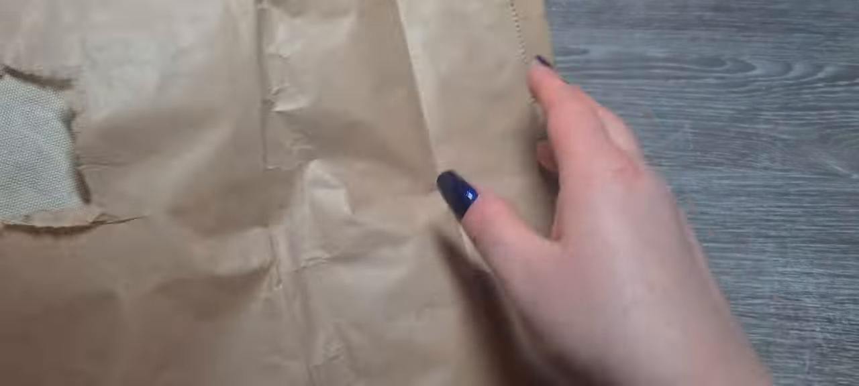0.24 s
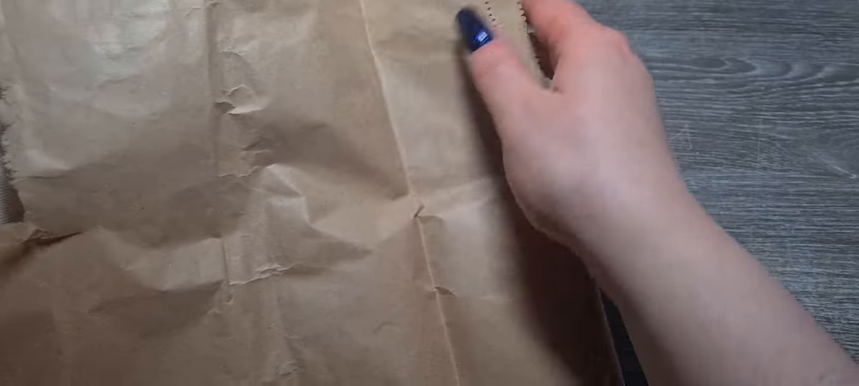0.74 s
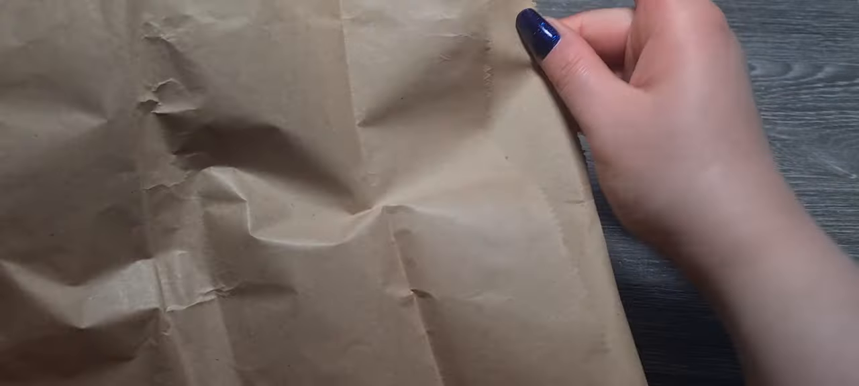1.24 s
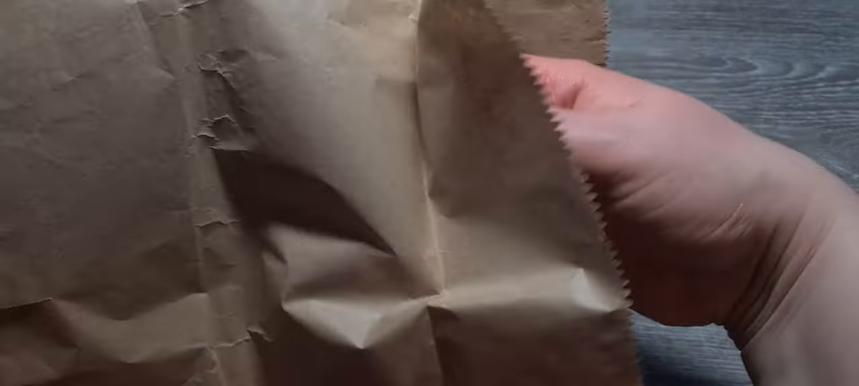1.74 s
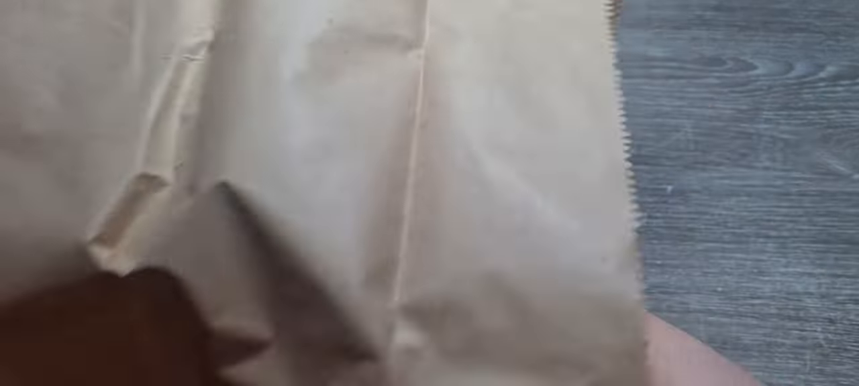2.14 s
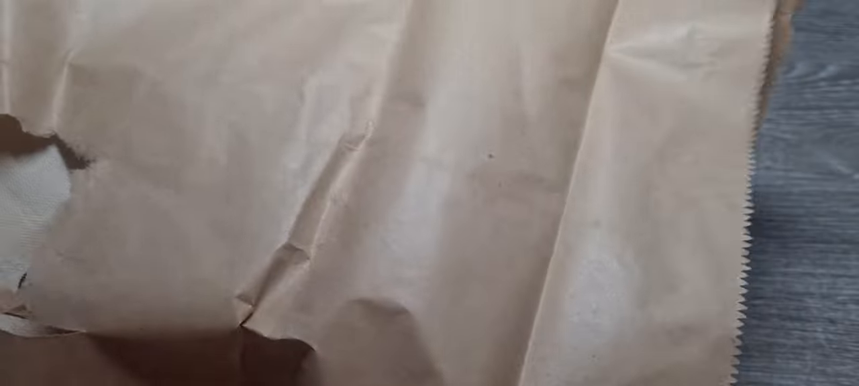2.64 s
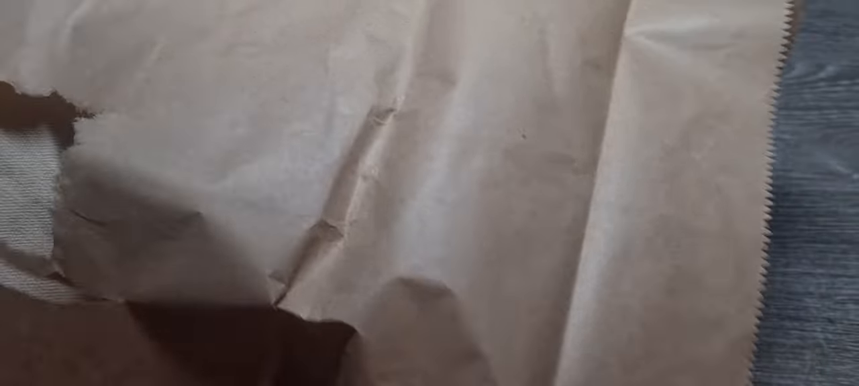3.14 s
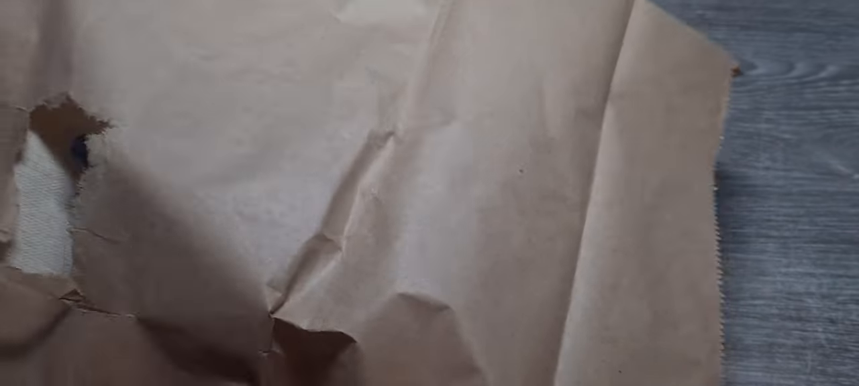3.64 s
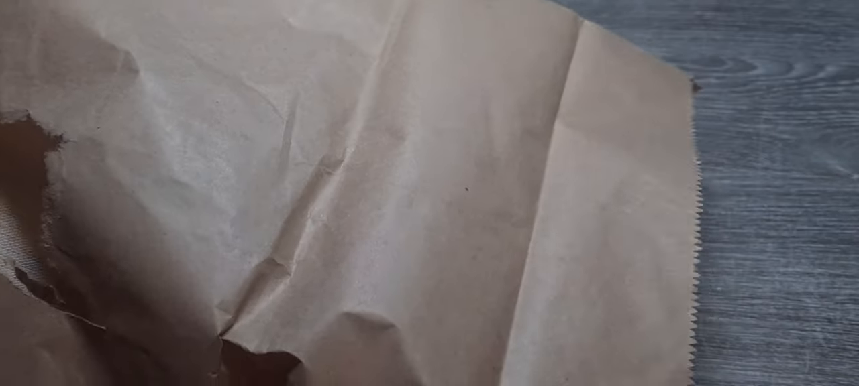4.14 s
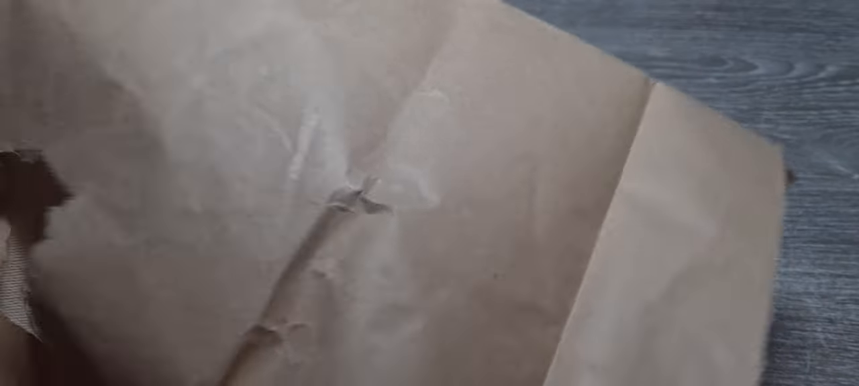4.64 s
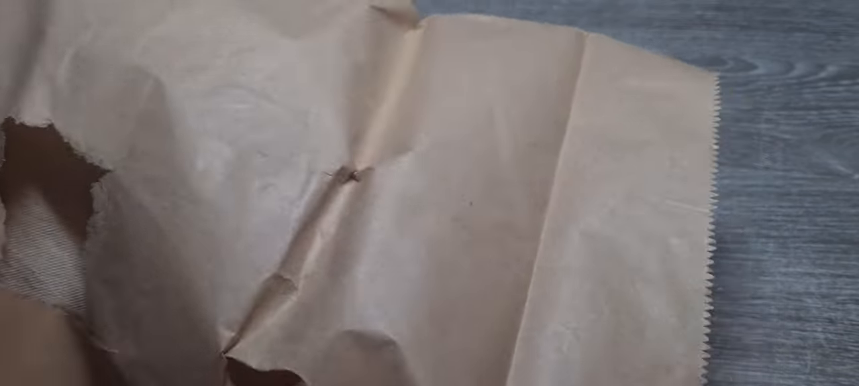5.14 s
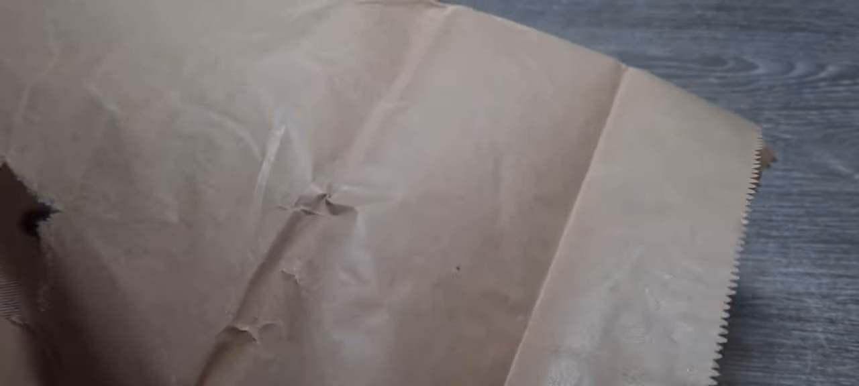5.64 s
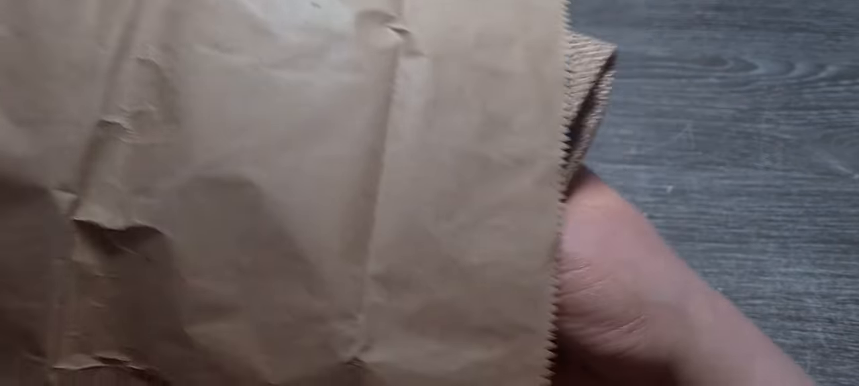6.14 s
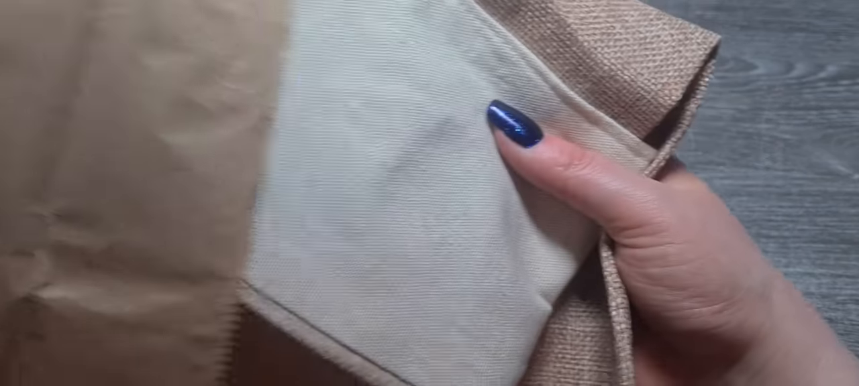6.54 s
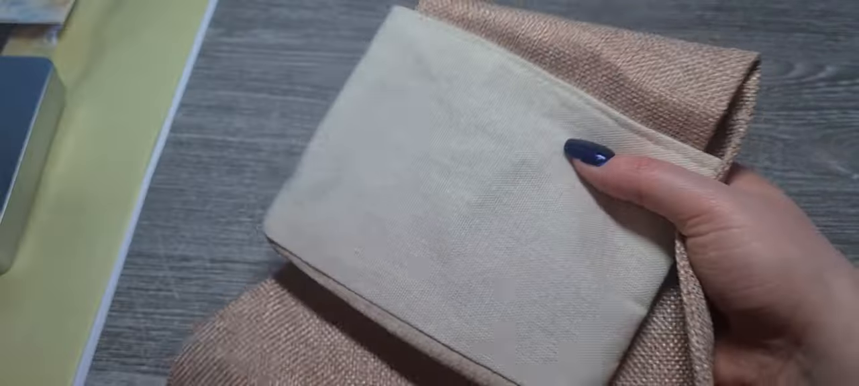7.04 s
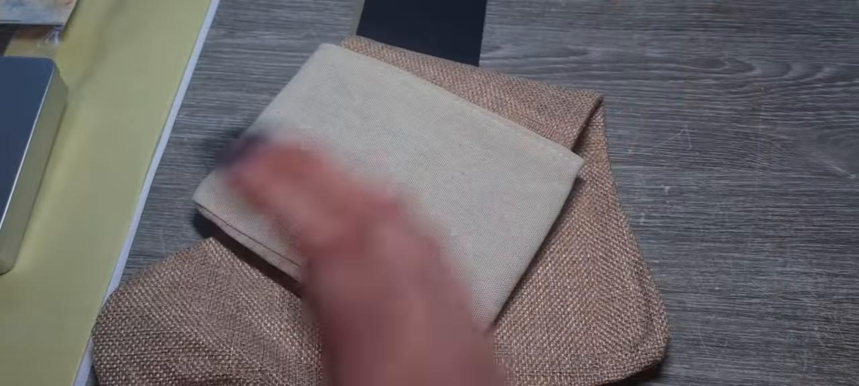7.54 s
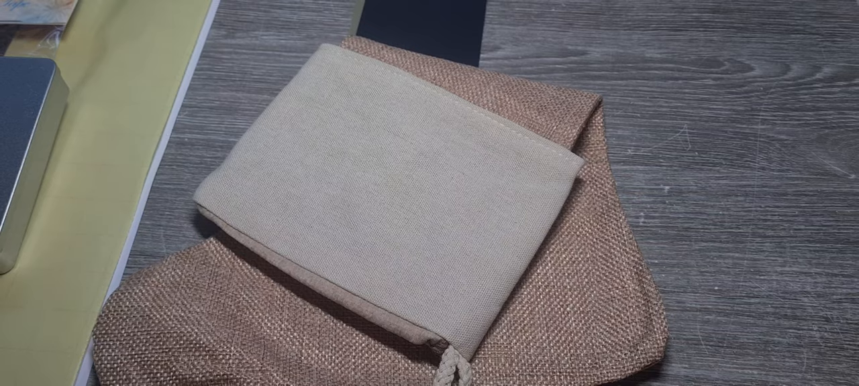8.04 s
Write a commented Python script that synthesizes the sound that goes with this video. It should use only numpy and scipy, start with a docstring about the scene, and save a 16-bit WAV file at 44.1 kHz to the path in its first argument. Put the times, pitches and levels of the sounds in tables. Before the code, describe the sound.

Hands work a torn paper bag open on a table. The paper crinkles and rubs in uneven bursts, with sharp snaps, dull pops from its flapping panels and soft bumps on the table top. Then cloth pouches slide out with a smooth, bright hiss, rustle and are laid down, and the paper stirs once more. It is heard close up in a small room, slightly from the left.

```python
"""A table in a small room. Hands work a torn kraft paper bag open: the paper snaps, ticks,
crinkles and rubs, broad panels flap and pop, and dull bumps come from the table top. Cloth pouches
slide out with a smooth friction hiss, rustle and are laid down; the paper stirs once more.
A close pair of microphones hears it slightly from the left."""
import sys
import numpy as np
from scipy import signal
from scipy.fft import rfft, irfft, next_fast_len
from scipy.io import wavfile
from scipy.ndimage import map_coordinates

SR = 44100
rng = np.random.default_rng(int(sys.argv[2]) if len(sys.argv) > 2 else 0)


def inscribe(sig):
    """Save sig as 16-bit PCM at rate SR to the path in sys.argv[1].

    A 1-D sig is mono; a 2-D sig holds one channel per row.
    Samples are clipped to [-1, 1] before scaling.
    """
    pcm = np.round(np.clip(np.atleast_2d(sig).T, -1, 1) * 32767)
    wavfile.write(sys.argv[1], SR, pcm.astype(np.int16))


N = 365796
TIME_S = np.arange(N) / SR
LEFT_LEAD_S = 0.0003363

# hand moves on the bag: start_s, attack_s, hold_s, crinkle_db, flex_db
BAG_PULLS = [(0.003, 0.02, 0.104, -38.5, -48.0), (0.14, 0.009, 0.05, -36.5, -45.5),
             (0.256, 0.008, 0.02, -41, -48), (0.429, 0.061, 0.01, -44.0, -55.0),
             (0.508, 0.025, 0.187, -46.0, -55.5), (0.668, 0.013, 0.092, -44.5, -60.0),
             (0.863, 0.009, 0.053, -44.5, -53.5), (1.183, 0.038, 0.033, -29.5, -40.0),
             (1.256, 0.009, 0.045, -41.5, -47.5), (1.379, 0.025, 0.009, -30.0, -39.5),
             (1.509, 0.035, 0.108, -43.5, -51.5), (1.719, 0.053, 0.086, -39.5, -48.0),
             (1.819, 0.011, 0.007, -24.0, -33.0), (1.929, 0.009, 0.006, -35.5, -42.0),
             (2.06, 0.064, 0.081, -31.0, -41.0), (2.216, 0.044, 0.073, -33.0, -41.5),
             (2.375, 0.044, 0.023, -33.5, -46.0), (2.473, 0.049, 0.093, -39.0, -48.0),
             (2.612, 0.024, 0.16, -41.0, -48.5), (2.931, 0.066, 0.029, -36.5, -45.5),
             (3.008, 0.023, 0.207, -40.0, -52.0), (3.139, 0.014, 0.14, -41.5, -48),
             (3.367, 0.045, 0.149, -40.0, -46.5), (3.555, 0.025, 0.143, -34.0, -41.5),
             (3.773, 0.035, 0.097, -44.5, -49.0), (3.925, 0.056, 0.129, -34.0, -42.5),
             (4.093, 0.013, 0.028, -34.5, -39.5), (4.254, 0.037, 0.021, -45.5, -53.5),
             (4.315, 0.017, 0.13, -38.0, -43.5), (4.541, 0.044, 0.09, -33.5, -36.5),
             (4.719, 0.03, 0.006, -39.5, -43.5), (4.796, 0.025, 0.118, -38.5, -44.0),
             (5.027, 0.069, 0.036, -47.0, -50.0), (5.088, 0.03, 0.068, -29.0, -36),
             (5.294, 0.044, 0.036, -31.5, -37.5), (5.382, 0.01, 0.089, -40.0, -46.0),
             (5.542, 0.03, 0.18, -41.0, -49.0), (7.946, 0.006, 0.087, -48.5, -64.5),
             (8.062, 0.016, 0.018, -40.0, -53.0), (8.173, 0.034, 0.034, -36.5, -52)]
# sharp paper snaps and ticks, plus one faint finger touch: start_s, level_db, length_ms, pitch_hz
SNAPS_AND_TICKS = [(0.0401, -23, 0.55, 5900), (0.1382, -22, 1.8, 7700), (0.1696, -26, 1.3, 5400),
                   (0.5167, -14, 0.48, 9400), (0.6927, -31, 1.0, 6000), (0.8659, -23, 1.17, 8600),
                   (1.0685, -46, 2, 3500), (1.1353, -34, 1.4, 4300), (1.1648, -25, 2.4, 8400),
                   (1.2219, -21, 1.5, 10400), (1.2869, -28, 1.2, 5000), (1.3803, -16.5, 0.84, 5800),
                   (1.7684, -21.5, 1.7, 5430), (1.8153, -9, 1.3, 8400), (1.8267, -13.5, 1.8, 12100),
                   (1.8531, -19, 1.3, 9000), (1.9356, -24, 2, 6170), (2.0417, -18, 0.63, 8300),
                   (2.0578, -13, 1.3, 10100), (2.0788, -18.5, 2.1, 6600), (2.1354, -16, 1.6, 7800),
                   (2.2098, -23, 2.4, 6200), (2.2174, -17, 1.2, 7300), (2.24, -16.5, 1.1, 7700),
                   (2.2842, -21.5, 2.8, 6200), (2.3251, -20, 0.85, 6400), (2.3979, -17, 0.92, 7800),
                   (2.4258, -25, 0.6, 1500), (2.7202, -21, 0.5, 14000), (2.9234, -14, 1.2, 8700),
                   (3.1404, -23.5, 1.1, 7500), (3.367, -17, 1.35, 8300), (3.4351, -25.5, 1.4, 7200),
                   (3.6068, -15, 1.1, 11700), (3.9562, -20.5, 1.7, 12500), (4.0255, -11.5, 0.62, 5680),
                   (4.0393, -14, 1.35, 7200), (4.2705, -24.5, 0.94, 7600), (4.3748, -26, 2.9, 5500),
                   (4.537, -21.5, 1.1, 5330), (4.5915, -22, 2.6, 6700), (4.72, -28, 3, 4060),
                   (4.8136, -22, 1.24, 7140), (4.9852, -31, 0.6, 6600), (5.1324, -21, 2, 9600),
                   (5.1525, -20, 1.6, 9800), (5.3216, -21, 2.3, 7500), (5.4236, -26, 2.3, 6300),
                   (5.5601, -26, 1.25, 5400), (5.6102, -24, 1.8, 6800), (5.6985, -19, 0.41, 5760),
                   (5.8982, -20, 1.6, 11200), (5.958, -22, 0.84, 11900), (6.6699, -27, 1.6, 7200),
                   (6.9208, -26.5, 0.74, 3900), (6.9555, -25, 1.4, 12400), (6.9868, -27.5, 2.6, 5870),
                   (7.274, -33, 4.4, 3500), (7.3939, -24, 1.1, 11000), (7.6629, -29.5, 0.95, 4700),
                   (7.7548, -24, 0.46, 3830), (7.8126, -24.5, 0.93, 7300), (8.1665, -26, 1.6, 4700),
                   (8.2041, -24, 0.97, 6600)]
# bag, hands and pouches hitting the table: start_s, level_db
TABLE_BUMPS = [(0.18, -55), (1.818, -50), (1.908, -50), (2.043, -43), (2.277, -48), (2.484, -46),
               (2.644, -50.5), (3.512, -57), (3.719, -49), (3.949, -42), (4.041, -40.5), (4.622, -48),
               (4.924, -55), (5.153, -50), (6.101, -47), (6.221, -51), (6.353, -52), (6.964, -52),
               (7.126, -52.5), (7.196, -46.5), (7.268, -43)]
# whole panels popping: start_s, level_db
PANEL_POPS = [(0.866, -37.5), (1.3841, -30), (1.8245, -31), (1.9346, -32), (1.996, -31.5), (2.0584, -30),
              (2.208, -33.5), (2.2402, -34.5), (2.4255, -34.5), (3.351, -38.5), (4.001, -32),
              (4.041, -31.5), (4.242, -40.5), (5.283, -35.5), (7.272, -38.5)]
# cloth dragged over paper: time_s, friction_db, flex_db
POUCH_SLIDE = [(5.75, -53, -71), (5.776, -37, -48.5), (5.972, -36.5, -47.5), (6.074, -32.5, -41),
               (6.252, -35.5, -44.5), (6.428, -41.5, -55.5), (6.56, -39, -56), (6.665, -48, -54.5),
               (6.725, -61, -78)]
# pouches shifted in the hand: start_s, attack_s, hold_s, rustle_db
POUCH_MOVES = [(6.761, 0.043, 0.027, -50.5), (6.881, 0.049, 0.006, -46.5), (6.961, 0.038, 0.077, -40.0),
               (7.069, 0.012, 0.109, -42.0), (7.279, 0.045, 0.118, -41.5), (7.513, 0.03, 0.082, -59.0),
               (7.669, 0.039, 0.115, -42.5)]
# hand position: time_s, left_over_right_db
HAND_PAN = [(0, 2), (1.2, -0.3), (2.2, 1.1), (3.3, 2), (4.05, -0.5), (5.7, 1.2), (6.2, 0.5), (6.9, 3),
            (7.7, 4), (8.2, 0.5)]

# spectral shapes of the sources: freq_hz, relative_db
CRINKLE_SPECTRUM = [(60, -24), (170, -8), (400, -14), (800, -5.5), (1200, 2.5), (2000, -7), (3400, 1.5),
                    (6500, 0), (12000, 0.5), (16000, -14)]
RUB_SPECTRUM = [(200, -22), (800, -16), (1300, -0.5), (2100, 9.5), (3300, 10), (6500, 6), (12000, 9),
                (16000, -4)]
SHEET_SPECTRUM = [(40, -20), (100, -11.5), (150, -5.5), (250, -3), (340, -2.5), (500, -5), (620, -4.5),
                  (880, -9.5), (1100, -3), (1700, -12.5), (4000, -35)]
SNAP_SPECTRUM = [(60, -14), (170, 6.5), (400, 0.5), (800, -0.5), (1200, 1.5), (2000, 0.5), (3400, 3.5),
                 (6500, 0.5), (12000, 1), (16000, -10)]
BUMP_SPECTRUM = [(20, -22), (45, -10.5), (75, -5.5), (130, -6), (220, -12.5), (500, -29.5), (2000, -58)]
POP_SPECTRUM = [(60, -21.5), (165, -0.5), (350, -1.5), (800, -7.5), (1200, 2.5), (1900, -8.5), (4000, -6.5),
                (16000, -29)]
SLIDE_SPECTRUM = [(300, -39), (900, -13), (1500, -6.5), (2300, -6), (3300, -0.5), (5000, -0.5), (7000, 0),
                  (11500, 3), (16000, -9)]
CLOTH_SPECTRUM = [(60, -1), (150, -3), (350, 6.5), (600, -5), (900, -6), (1450, 3), (2200, -2), (3500, 1),
                  (6500, -3), (11000, -3.5), (16000, -15)]
ROOM_TONE_SPECTRUM = [(20, -13), (110, 15), (220, -30), (1000, 9), (2000, -30), (7000, 5), (16000, -2)]

# resonant modes of the paper sheet: centre_hz, width_hz, gain_db
BAG_RESONANCES = [(165, 20, 6), (328, 51, 3.5), (436, 28, 3.5), (1180, 210, 2.5)]
# peaks and notches of the microphone ports: centre_hz, width_hz, gain_db
LEFT_PORT_BANDS = [(3640, 2800, -1.5), (7110, 1260, 9.5), (7850, 1620, -9), (11000, 1000, -3.5)]
RIGHT_PORT_BANDS = [(2400, 470, -8), (4320, 1500, -5), (7420, 580, 5.5), (8070, 1500, -11), (11500, 780, 1)]
# likeness of left and right: freq_hz, coherence
MIC_COHERENCE = [(100, 0.99), (300, 1), (600, 0.74), (1300, 0.44), (2500, 0.07), (15000, 0.15)]


def from_db(db):
    """Decibels to gain."""
    return 10 ** (np.asarray(db) / 20)


def unit_rms(x):
    """Scale to rms 1."""
    return x / np.sqrt(np.mean(x ** 2) + 1e-20)


def at_hz(table, hz):
    """Table lookup on a log-frequency axis."""
    table = np.array(table)
    return np.interp(np.log(hz + 1e-3), np.log(table[:, 0]), table[:, 1])


def waver(spread_db, rate_hz):
    """Random gain, gliding between rate_hz knots a second."""
    knots = rng.standard_normal(N // 10)
    drift = np.interp(TIME_S * rate_hz, np.arange(len(knots)), knots)
    return from_db(spread_db * unit_rms(drift))


def swell(start_s, attack_s, hold_s, release_s):
    """Gain that reaches 1 at start_s, holds and decays."""
    early = np.minimum(TIME_S - start_s, 0) / attack_s
    late = np.maximum(TIME_S - start_s - hold_s, 0) / release_s
    return np.exp(-np.minimum(early ** 2 + late, 20))


def move_force(rows, column):
    """Power sum of one swell per hand move."""
    swells = (from_db(row[column]) * swell(*row[:3], release_s=0.041) for row in rows)
    return np.sqrt(sum(gain ** 2 for gain in swells))


def gain_curve(rows, column, fade_s=0.015):
    """A dB column as gain over time, faded beyond its ends."""
    rows = np.array(rows)
    outside_s = np.maximum(rows[0, 0] - TIME_S, 0) + np.maximum(TIME_S - rows[-1, 0], 0)
    fade = np.maximum(1 - outside_s / fade_s, 0)
    return from_db(np.interp(TIME_S, rows[:, 0], rows[:, column])) * fade


def colour(x, spectrum, size=4096):
    """Minimum-phase filter; white noise keeps its power."""
    magnitude = from_db(at_hz(spectrum, np.fft.rfftfreq(size, 1 / SR)))
    cepstrum = irfft(np.log(magnitude))
    cepstrum[1:size // 2] *= 2
    cepstrum[size // 2 + 1:] = 0
    response = irfft(np.exp(rfft(cepstrum)))
    return signal.oaconvolve(x, response[None] / np.linalg.norm(response), axes=1)[:, :N]


def resonate(x, bands):
    """Peaks and notches in series."""
    for centre_hz, width_hz, gain_db in bands:
        g = from_db(gain_db / 2)
        k = np.tan(np.pi * width_hz / SR)
        tuning = -2 * np.cos(2 * np.pi * centre_hz / SR)
        x = signal.lfilter([1 + k * g, tuning, 1 - k * g], [1 + k / g, tuning, 1 - k / g], x)
    return x


def mic_pair(a, b, hz, lead_s):
    """Two independent spectra to stereo: alike in the bass, left leading."""
    coherence = np.clip(at_hz(MIC_COHERENCE, hz), 0, 1)
    mid, side = np.sqrt((1 + coherence) / 2) * a, np.sqrt((1 - coherence) / 2) * b
    return np.array([mid + side, (mid - side) * np.exp(-2j * np.pi * hz * lead_s)])


def noise(spectrum):
    """Coloured stereo noise, rms about 1."""
    size = next_fast_len(N, True)
    a, b = rfft(rng.standard_normal((2, size)))
    white = irfft(mic_pair(a, b, np.fft.rfftfreq(size, 1 / SR), LEFT_LEAD_S), size)
    return colour(white, spectrum)


def cracks(rows, broad_db, rise_ratio, creak_db, size=1024):
    """One resonant noise burst per row: start_s, level_db, length_ms, pitch_hz."""
    start_s, level_db, length_ms, pitch_hz = np.array(rows).T[:, :, None]
    offsets, hz = np.arange(size) - size // 2, np.fft.rfftfreq(size, 1 / SR)
    age = 1000 * offsets / SR / length_ms
    # longer cracks creak more around the peak
    creak = from_db(creak_db) * np.minimum(length_ms, 2) * np.exp(-np.abs(age) / 4.6)
    envelope = np.exp(-np.maximum(age, -age / rise_ratio)) + creak
    a, b = rfft(rng.standard_normal((len(start_s), 2, size)).swapaxes(0, 1) * envelope)
    facet = from_db(broad_db) + 1 / (1 + 0.9j * (hz / pitch_hz - pitch_hz / (hz + 1)))
    lead_s = LEFT_LEAD_S * rng.uniform(0.59, 1.485, start_s.shape)  # each from its own spot
    bursts = irfft(mic_pair(a * facet, b * facet, hz, lead_s))
    power_ratio = np.mean(envelope ** 2, axis=1) / np.mean(bursts ** 2, axis=(0, 2))
    bursts *= from_db(level_db) * np.sqrt(power_ratio)[:, None]
    indices = np.maximum((start_s * SR).astype(int) + offsets, 0).ravel()
    return np.array([np.bincount(indices, side.ravel(), N)[:N] for side in bursts])


def grains(rate_hz, spread_db, length_ms, low_hz, high_hz, count=6000):
    """Tiny random cracks, many weak, few strong; rms 1."""
    wait, strength, length, pitch = rng.uniform(1e-6, 1, (count, 4)).T
    start_s = np.cumsum(-np.log(wait)) / rate_hz
    level_db = spread_db * np.minimum(-np.log(strength), 3)
    rows = np.c_[start_s, level_db, length_ms * (0.5 + length), low_hz * (high_hz / low_hz) ** pitch]
    rows = rows[start_s < N / SR]
    return unit_rms(cracks(rows, broad_db=-12.5, rise_ratio=0.5, creak_db=-8.5, size=256))


def crinkling(effort, flex, flex_share=0.45):
    """Small creases and fibres give way while paper rubs on paper."""
    ticks = grains(rate_hz=340, spread_db=5.5, length_ms=1.0, low_hz=2170, high_hz=13800)
    crackle = colour(ticks, CRINKLE_SPECTRUM)
    rub = noise(RUB_SPECTRUM) * waver(spread_db=2, rate_hz=220)
    rub_force = effort * (flex / effort) ** flex_share
    return from_db(-4) * effort * crackle + from_db(-0.9) * rub_force * rub


def flexing_sheet(flex):
    """Broad panels flap unevenly and ring at the sheet's own modes."""
    flaps = flex * noise(SHEET_SPECTRUM) * waver(spread_db=3.25, rate_hz=90)
    return from_db(-3.2) * resonate(flaps, BAG_RESONANCES)


def lesser_creases(force, rate_hz=22, low_hz=3350, high_hz=9900, count=400):
    """Mid-sized creases snap at random, as loud as the hands press."""
    wait, length, pitch = rng.uniform(1e-6, 1, (count, 3)).T
    start_s = np.cumsum(-np.log(wait)) / rate_hz
    force_db = 20 * np.log10(np.interp(start_s, TIME_S, force))
    level_db = force_db + rng.normal(6, 2, count)
    length_ms = 0.5 + length
    rows = np.c_[start_s, level_db, length_ms, low_hz * (high_hz / low_hz) ** pitch]
    snaps = cracks(rows[start_s < N / SR], broad_db=-14.5, rise_ratio=0.54, creak_db=-15)
    return colour(snaps, SNAP_SPECTRUM)


def snaps_and_ticks():
    """Sharp paper snaps and ticks, plus one faint finger touch."""
    snaps = cracks(SNAPS_AND_TICKS, broad_db=-12, rise_ratio=0.67, creak_db=-16.5)
    return from_db(-0.5) * colour(snaps, SNAP_SPECTRUM)


def table_bumps(flex, handling):
    """Dull knocks, plus air pushed along the table by paper and cloth."""
    knocks = sum(from_db(level_db) * swell(start_s, attack_s=0.01, hold_s=0.0075, release_s=0.029)
                 for start_s, level_db in TABLE_BUMPS)
    air = (from_db(-19) * flex + from_db(-21) * handling) * waver(spread_db=3, rate_hz=25)
    return (from_db(1) * knocks + air) * noise(BUMP_SPECTRUM)


def popping_panels(length_ms=1.98, pitch_hz=1080):
    """Broad panels give way more slowly, with a dull pop."""
    rows = [(start_s, level_db, length_ms, pitch_hz) for start_s, level_db in PANEL_POPS]
    pops = cracks(rows, broad_db=5.5, rise_ratio=0.87, creak_db=-13.5)
    return from_db(1) * colour(pops, POP_SPECTRUM)


def sliding_pouches():
    """Cloth drawn over paper: a smooth, bright friction hiss."""
    friction = gain_curve(POUCH_SLIDE, column=1)
    return from_db(3.5) * friction * noise(SLIDE_SPECTRUM) * waver(spread_db=1.7, rate_hz=230)


def rustling_cloth(handling):
    """Coarse threads catch and slip over an uneven swish."""
    slips = grains(rate_hz=480, spread_db=4, length_ms=0.7, low_hz=1400, high_hz=8000)
    swish = noise(CLOTH_SPECTRUM) * waver(spread_db=2.3, rate_hz=70)
    return handling * (from_db(-2) * colour(slips, CLOTH_SPECTRUM) + from_db(-5) * swish)


def pan_to_hands(x, lag_s_per_db=0.00007, usual_pan_db=1.5):
    """Hands further left: louder on the left, later on the right."""
    pan_db = np.interp(TIME_S, *np.transpose(HAND_PAN))
    lag_s = lag_s_per_db * (pan_db - usual_pan_db)
    right = map_coordinates(x[1], [(TIME_S - lag_s) * SR], order=5)
    return np.array([x[0], right]) * from_db([pan_db / 2, -pan_db / 2])


def room(x, t60_s, wet_db, echo_db, echo_s, size=12288, block=4096):
    """Short tail with a cluster of wall echoes; the paper moves, so each block rings anew."""
    age_s, hz = TIME_S[:size - block], np.fft.rfftfreq(size, 1 / SR)
    echoes = from_db(echo_db) * np.exp(-((age_s - echo_s) / 0.0013) ** 2)
    tail = from_db(-60 * age_s / t60_s) * (1 + echoes) * (age_s > 0.002)
    tail *= from_db(wet_db) / np.linalg.norm(tail)
    out = np.pad(x, [(0, 0), (0, size)])
    for start in range(0, N, block):
        a, b = rfft(rng.standard_normal((2, len(age_s))) * tail, size)
        response = mic_pair(a, b, hz, lead_s=0)
        out[:, start:start + size] += irfft(rfft(x[:, start:start + block], size) * response)
    return out[:, :N]


def scene():
    """Hand forces drive paper, cloth and table over a faint room tone."""
    grip = waver(spread_db=1, rate_hz=40)
    held = from_db(-63) * (TIME_S < 5.75)  # the bag stirs faintly until let go
    drag = gain_curve(POUCH_SLIDE, column=2)  # the pouches pull the paper along
    effort = grip * np.hypot(move_force(BAG_PULLS, column=3), held) + from_db(-3) * drag
    flex = grip * np.hypot(move_force(BAG_PULLS, column=4), from_db(-8) * held) + drag
    handling = grip * move_force(POUCH_MOVES, column=3)
    snaps = snaps_and_ticks() + lesser_creases(effort + handling) + popping_panels()
    paper = crinkling(effort, flex) + flexing_sheet(flex)
    cloth = sliding_pouches() + rustling_cloth(handling)
    direct = pan_to_hands(snaps + paper + cloth)
    heard = room(direct, t60_s=0.21, wet_db=-8.5, echo_db=-6, echo_s=0.024)
    return heard + table_bumps(flex, handling) + from_db(-64) * noise(ROOM_TONE_SPECTRUM)


def record(dry):
    """Each microphone port colours its side; steep low-pass at 15.9 kHz."""
    heard = np.array([resonate(dry[0], LEFT_PORT_BANDS), resonate(dry[1], RIGHT_PORT_BANDS)])
    return signal.sosfilt(signal.ellip(12, 0.1, 80, 15900, fs=SR, output="sos"), heard)


dry = scene()
out = record(dry)
inscribe(out)
```